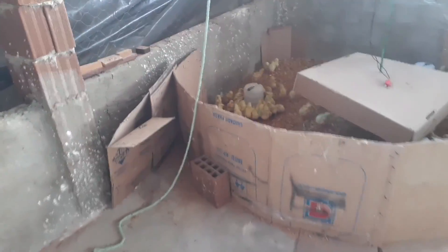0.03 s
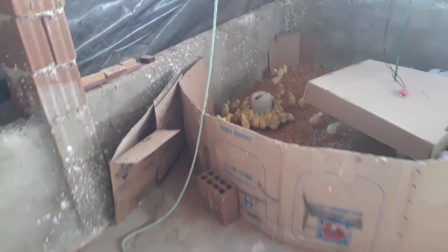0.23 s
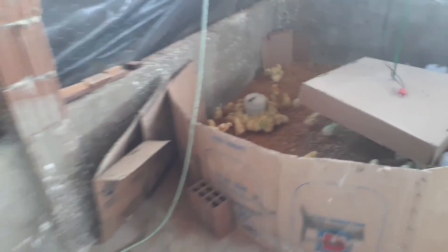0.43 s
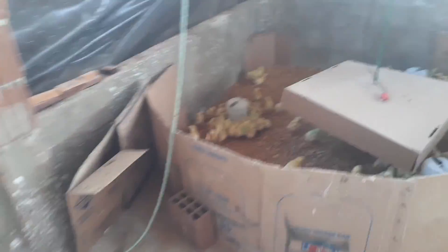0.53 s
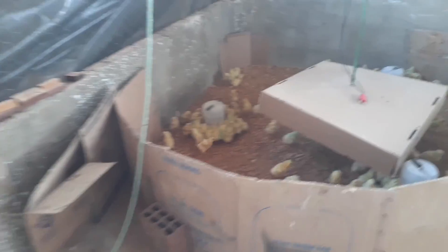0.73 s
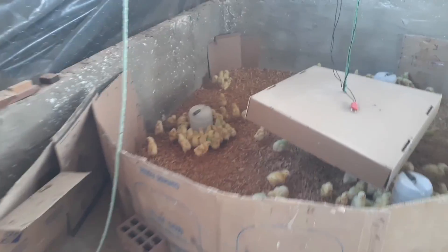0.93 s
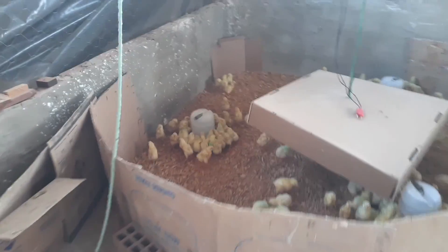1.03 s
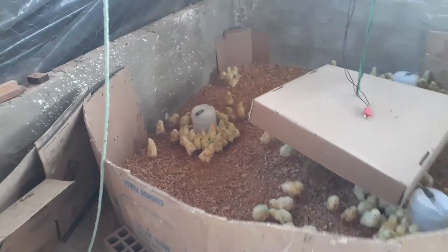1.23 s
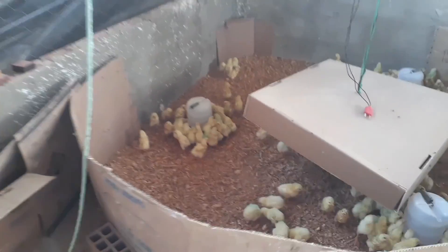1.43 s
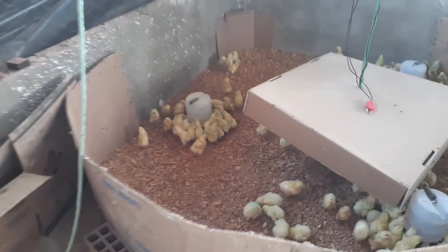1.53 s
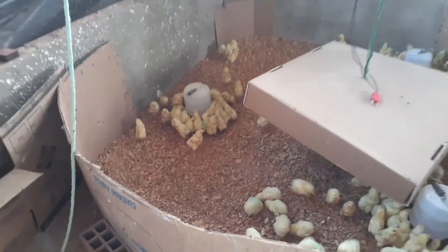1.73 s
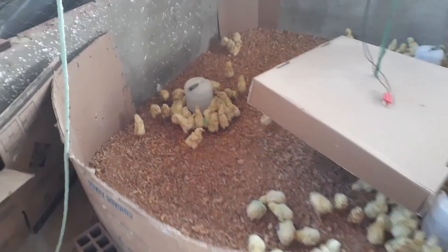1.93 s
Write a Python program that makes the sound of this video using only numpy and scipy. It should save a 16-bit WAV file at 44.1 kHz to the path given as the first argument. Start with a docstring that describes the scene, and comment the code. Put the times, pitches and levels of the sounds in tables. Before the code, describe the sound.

Many chicks cheep in short, high, overlapping whistles, some close to the microphone, with a brief indoor echo. A light tap comes early, a sharp snap midway and a soft bump at the end, over a quiet hum.

```python
"""Concrete-walled brooder: a large brood of chicks, the near ones standing out of a dense, echoing chorus.
Each peep is an almost pure whistle that bends, mostly downward; walls add reflections and a tail.
Brief events: a sharp snap and rustles (shaped noise), a light tap and a soft bump (damped sines).
Underneath: far hoots, a low hum, room noise."""
import sys
import numpy as np
from scipy import signal
from scipy.fft import rfft, irfft
from scipy.io import wavfile

SR = 44100
rng = np.random.default_rng(int(sys.argv[2]) if len(sys.argv) > 2 else 0)


def materialize(psi):
    """Save the field psi as 16-bit PCM at rate SR to the path in sys.argv[1].

    A 1-D psi becomes a single channel; in a 2-D psi each row is a channel.
    """
    bounded = np.clip(np.atleast_2d(psi).T, -1, 1)
    quanta = np.round(bounded * 32767).astype(np.int16)
    wavfile.write(sys.argv[1], SR, quanta)


N = 88200

# near peeps: t/s, length/s, first f/Hz, middle f/Hz, last f/Hz, level/dB
NEAR_PEEPS = [ (.11, 0.097, 4510, 4310, 4020, -47), (.145, 0.05, 3966, 3690, 3310, -39.5),
              (.13, 0.07, 2880, 2550, 2220, -42.5), (.2, .06, 3286, 2820, 2420, -34.5),
              (.235, 0.07, 2946, 2640, 2020, -45), (.31, 0.065, 2205, 2750, 3200, -42.5),
              (.335, 0.044, 4000, 4374, 4380, -43.5), (.37, 0.04, 3180, 3110, 2900, -36),
              (.35, 0.055, 2857, 2577, 2005, -32.5), (.392, 0.0368, 2488, 2460, 2370, -27),
              (.395, 0.043, 3040, 2920, 2800, -37), (.405, 0.039, 2070, 1978, 1880, -36),
              (.405, 0.0724, 4100, 4175, 4300, -42.5), (.566, 0.07, 4100, 3600, 2750, -40),
              (.645, 0.07, 4250, 4080, 3650, -44), (.615, 0.055, 3050, 3200, 3350, -41),
              (.66, 0.12, 3150, 2783, 2640, -37), (.68, 0.091, 3770, 3583, 3200, -38.5),
              (.69, 0.08, 2476, 2320, 2325, -44), (.75, 0.043, 2722, 2946, 3840, -34),
              (.748, 0.057, 3010, 2796, 2490, -36.5), (.795, 0.056, 2630, 2450, 2700, -41),
              (.855, 0.041, 3766, 3227, 2670, -35), (.86, 0.041, 2776, 2593, 2360, -38),
              (.905, 0.032, 1940, 1910, 1900, -47), (.915, 0.046, 4050, 4265, 4100, -42.5),
              (.9, .11, 4700, 4650, 4520, -57), (.92, 0.044, 3790, 3990, 3750, -42),
              (.945, 0.08, 3598, 3270, 2930, -37.5), (1.03, 0.03, 2870, 2740, 2600, -28.5),
              (1.06, 0.028, 3560, 3700, 3620, -35), (1.06, 0.093, 4620, 4870, 4440, -45),
              (1.085, 0.06, 4200, 4220, 4340, -43), (1.115, 0.037, 2490, 2120, 1950, -42.5),
              (1.29, 0.083, 2176, 2025, 1835, -45), (1.315, 0.057, 3650, 3130, 2560, -34.5),
              (1.425, 0.077, 3450, 3244, 2850, -40), (1.5, 0.077, 3700, 4070, 4125, -39.5),
              (1.53, 0.039, 2550, 2380, 2170, -37.5), (1.545, 0.048, 3450, 3350, 3050, -37),
              (1.595, 0.044, 4040, 4205, 4080, -39.5), (1.605, 0.066, 4050, 3740, 3320, -34.5),
              (1.675, 0.051, 3780, 3940, 4070, -38), (1.71, 0.036, 2030, 1926, 1690, -44.5),
              (1.705, 0.14, 3795, 3624, 3510, -38.5), (1.745, 0.084, 3500, 3190, 2890, -35),
              (1.765, 0.043, 2930, 2686, 2626, -34.5), (1.795, 0.043, 2435, 2810, 3080, -40),
              (1.785, 0.079, 4200, 4230, 4090, -45), (1.87, 0.097, 4110, 4330, 4500, -43),
              (1.91, 0.053, 3520, 3323, 2960, -35)]
# overtone weighting: f/Hz, level/dB
OVERTONE_SPECTRUM = [(4700, -19.5), (5500, -27.5), (7400, -30), (8500, -20), (10000, -29), (13000, -34)]
# chorus envelope: t/s, level/dB
CHORUS_ENVELOPE = [(0, -43), (.4, -39.5), (.53, -42.5), (.65, -45), (.92, -40.5), (1.12, -42.5),
                   (1.25, -41.5), (1.55, -42.5), (1.8, -41), (2, -42.5)]
# chorus colour: f/Hz, level/dB
CHORUS_SPECTRUM = [(1600, -15), (2000, -0.5), (2500, 1.5), (3000, 2), (3600, -3), (4300, -5), (5200, -53),
                   (7300, -50), (8600, 9.5), (13000, 9)]
# bursts of the snap: t/s, decay/s, level/dB
SNAP_BURSTS = [(1.0538, .002, -30), (1.056, .001, -19), (1.0615, .0014, -30), (1.0715, .0014, -32)]
# snap colour: f/Hz, level/dB
SNAP_SPECTRUM = [(500, -51), (2000, -2.5), (4500, -4), (7000, -8.5), (8700, 3), (11000, -3.5), (15500, -11)]
# ringing of the tap: f/Hz, decay/s, level/dB
TAP_RESONANCES = [(2450, .00035, -17), (1250, .0008, -29.5), (4200, .0002, -23)]
# knocks of the bump: t/s, level/dB
BUMP_KNOCKS = [(1.963, -36), (1.977, -32.5), (1.985, -29.5), (1.992, -23.5)]
# rustles: centre t/s, half length/s, level/dB
RUSTLE_SWELLS = [(0.264, 0.027, -49.5), (0.388, 0.045, -50.5), (0.475, 0.022, -56), (1.004, 0.045, -50),
                 (1.125, 0.048, -54), (1.44, 0.083, -59.5), (1.97, 0.028, -46.5)]
# rustle colour: f/Hz, level/dB
RUSTLE_SPECTRUM = [(300, -77), (1500, -19), (4500, 6), (7300, -6), (9000, 1), (15500, -7)]
# far hoots: t/s, length/s, f/Hz, level/dB
FAR_HOOTS = [(1.17, .07, 520, -58), (1.46, .28, 530, -59.5), (1.76, 0.06, 549, -55)]
# hum envelope: t/s, level/dB
HUM_ENVELOPE = [(0, -51), (.18, -51), (.28, -57.5), (.52, -56.5), (.62, -52), (.95, -48.5), (1.07, -62),
                (1.15, -57.5), (1.58, -49.5), (1.72, -55), (1.77, -58), (1.82, -52), (2, -59.5)]
# room noise colour: f/Hz, level/dB
NOISE_SPECTRUM = [(20, -30), (33, -11), (48, -2.5), (100, 2), (190, 0.5), (300, -5), (420, -9.5), (530, -5),
                  (900, -7), (1500, -13.5), (3000, -1.5), (5500, -19), (7400, -23.5), (9000, -23.5),
                  (15500, -24)]
# room noise swell: t/s, level/dB
NOISE_ENVELOPE = [(.12, 3.5), (.35, 1), (1.4, 1.5), (2, 0.3)]
# room noise likeness between ears: f/Hz, correlation
NOISE_COHERENCE = [(60, 0.86), (150, 0.93), (350, 0.86), (700, 0.24), (1300, 0)]
# room noise balance: f/Hz, left minus right level/dB
NOISE_BALANCE = [(100, 1), (700, 0.5), (1500, -3.5), (5000, -1), (9000, 5), (14000, 3.5)]
# brooder reverberation: f/Hz, T60/s
ROOM_T60 = [(200, 0.42), (2500, 0.29), (14000, 0.24)]

TIME_S, BINS_HZ = np.arange(N) / SR, np.fft.rfftfreq(N, 1 / SR)
NEAR_PAN_DB, EAR_SPREAD_S, WAVER_S = 3.5, .00031, .0025


def peep(length_s, first_hz, middle_hz, last_hz, waver):
    """Whistle on a shaky pitch arc: clear when high, hoarse when low."""
    clear_hz, hoarse_hz, shake_depth, flutter_db = 5400, 2400, .024, 5.5
    rise, fall = .26, .32  # shares of the length
    u = np.linspace(0, 1, round(length_s * SR))
    shake, flutter = (np.roll(waver, int(at * N))[:len(u)] for at in rng.random(2))
    hz = np.polyval(np.polyfit([0, .5, 1], [first_hz, middle_hz, last_hz], 2), u)
    hoarse = np.clip((clear_hz - hz) / (clear_hz - hoarse_hz), 0, 1)
    phase = 2 * np.pi * np.cumsum(hz * (1 + shake_depth * hoarse * shake)) / SR
    overtones = sum(amp(lookup(OVERTONE_SPECTRUM, k * hz)) * np.sin(k * phase) / (k - 1) for k in (2, 3))
    swell = np.sin(np.pi / 2 * np.minimum(u / rise, 1))
    fade = np.sin(np.pi / 2 * np.minimum((1 - u) / fall, 1))
    return swell * fade * unit_rms(amp(flutter_db * flutter) * (np.sin(phase) + overtones))


def near_chicks(direct_db=-9, echo_db=-4, typical_db=-36, boost_db_per_db=.8):
    """Closest chicks, direct and off the walls. Louder ones are closer: more direct sound."""
    waver, direct, places = drift(WAVER_S), np.zeros((2, N)), np.zeros((8, N))
    for k, (start_s, length_s, *arc_hz, db) in enumerate(NEAR_PEEPS):
        call = amp(db) * peep(length_s, *arc_hz, waver)
        close = amp(boost_db_per_db * max(db - typical_db, 0)) * call
        add(direct[0], start_s + EAR_SPREAD_S * rng.uniform(-1, 1), close)
        add(direct[1], start_s, close)
        add(places[k % len(places)], start_s, call)
    echoes = sum(room(place) for place in places)
    return pan(NEAR_PAN_DB) * (amp(direct_db) * direct + amp(echo_db) * echoes)


def chorus(count=480, range_db=9):
    """Rest of the brood: overlapping falling peeps at many distances, mostly echo."""
    top_hz, end_ratio, shortest_s, longest_s = (2398, 4249), (.72, .92), .03066, .065
    waver, direct, places = drift(WAVER_S), np.zeros((2, N)), np.zeros((4, N))
    for k, (when, span, top, drop, bend, nearness) in enumerate(rng.random((count, 6))):
        first_hz = np.interp(top, [0, 1], top_hz)
        last_hz = first_hz * np.interp(drop, [0, 1], end_ratio)
        middle_hz = first_hz + (last_hz - first_hz) * bend / 2
        length_s = np.interp(span, [0, 1], [shortest_s, longest_s])
        call = amp(range_db * nearness) * peep(length_s, first_hz, middle_hz, last_hz, waver)
        start_s = (k + when) / count * (N / SR + longest_s) - longest_s
        add(places[k % len(places)], start_s, call)
        for ear in direct:
            add(ear, start_s + EAR_SPREAD_S * rng.uniform(-.89, 1), nearness ** 2 / 2 * call)
    echoes = sum(room(place) for place in places)
    return pan(right_db=5.5) * envelope(CHORUS_ENVELOPE) * colour(direct + echoes, CHORUS_SPECTRUM)


def snap(echo_db=-6):
    """Cluster of bright noise bursts, gone in milliseconds, plus echo."""
    fade = sum(amp(db) * (TIME_S >= at_s) * np.exp(-abs(TIME_S - at_s) / decay_s)
               for at_s, decay_s, db in SNAP_BURSTS)
    burst = fade * colour(rng.standard_normal((2, N)), SNAP_SPECTRUM)
    return pan(right_db=1.7) * (burst + amp(echo_db) * room(burst[0]))


def knock(at_s, hz, decay_s, db):
    """Heavily damped blow: about one swing."""
    t = np.maximum(TIME_S - at_s, 0)
    return amp(db) * np.sin(2 * np.pi * hz * t) * np.exp(-t / decay_s)


def tap(at_s=.46, low_cut_hz=796, echo_db=-4.5):
    """Light, hard tap: damped modes plus echo."""
    ring = sum(knock(at_s, *mode) for mode in TAP_RESONANCES)
    blow = signal.sosfilt(signal.butter(2, low_cut_hz, "high", fs=SR, output="sos"), ring)
    return pan(NEAR_PAN_DB) * (blow + amp(echo_db) * room(blow))


def bump(hz=262, decay_s=.0018):
    """Quick run of dull knocks, close by."""
    return sum(knock(at_s, hz, decay_s, db) for at_s, db in BUMP_KNOCKS)


def rustles(grain_db=1.6, grain_s=.0062):
    """Brief swells of fine, grainy scuffing."""
    swell = sum(amp(db) * np.exp(-((TIME_S - at_s) / half_s) ** 2 / 2)
                for at_s, half_s, db in RUSTLE_SWELLS)
    grains = rng.standard_normal((2, N)) * amp(grain_db * drift(grain_s))
    return swell * colour(grains, RUSTLE_SPECTRUM)


def hoots(sag=.029):
    """Faint, unsteady, sinking tones, perhaps distant poultry."""
    waver, calls = drift(scale_s=.0071), np.zeros(N)
    for start_s, length_s, hz, db in FAR_HOOTS:
        add(calls, start_s, amp(db) * peep(length_s, hz * (1 + sag), hz, hz * (1 - sag), waver))
    return (calls + room(calls)) / np.sqrt(2)


def hum(centre_hz=71.3, waver_depth=.032):
    """Low, slowly wavering tone."""
    hz = centre_hz * (1 + waver_depth * drift(scale_s=.16))
    return envelope(HUM_ENVELOPE) * np.sqrt(2) * np.sin(2 * np.pi * np.cumsum(hz) / SR)


def room_noise(base_db=-46.5):
    """Near-steady noise, alike in both ears in the bass."""
    common, separate = rfft(rng.standard_normal((2, N)))
    coherence = lookup(NOISE_COHERENCE, BINS_HZ)
    tilt = amp(lookup(NOISE_BALANCE, BINS_HZ) / 2)
    right = coherence * common + np.sqrt(1 - coherence ** 2) * separate
    noise = irfft(np.array([common * tilt, right / tilt]), N)
    return amp(base_db) * envelope(NOISE_ENVELOPE) * colour(noise, NOISE_SPECTRUM)


def room(x, reflections=6, early_db=-3, gap_s=.002, early_span_s=.011, build_s=.0059):
    """Stereo echo from one spot: a few wall reflections, then a dense tail."""
    hz, t, noise = signal.stft(rng.standard_normal((2, SR // 2)), SR, nperseg=256)
    decay = amp(-60 * t / lookup(ROOM_T60, hz)[:, None])
    response = signal.istft(noise * decay * np.minimum(t / build_s, 1), SR, nperseg=256)[1]
    response /= np.linalg.norm(response, axis=1, keepdims=True)
    pulse = amp([early_db]) / np.sqrt(reflections)
    for ear in response:
        for when, polarity in rng.random((reflections, 2)):
            add(ear, gap_s + when * early_span_s, np.sign(polarity - .5) * pulse)
    response /= np.linalg.norm(response, axis=1, keepdims=True)
    return signal.fftconvolve(x[None], response, axes=1)[:, :N]


def amp(db):
    """dB to gain."""
    return 10 ** (np.asarray(db) / 20)


def unit_rms(x):
    """Scale to rms 1."""
    return x / np.sqrt(np.mean(x ** 2) + 1e-20)


def lookup(table, hz):
    """Interpolate over log frequency."""
    table_hz, values = np.transpose(table)
    return np.interp(np.log(hz + 1), np.log(table_hz + 1), values)


def envelope(table):
    """Level table to gain per sample."""
    return amp(np.interp(TIME_S, *np.transpose(table)))


def colour(x, spectrum):
    """Filter by a spectrum table; rms 1."""
    return unit_rms(irfft(rfft(x) * amp(lookup(spectrum, BINS_HZ)), N))


def pan(right_db):
    """Left and right gains."""
    return amp([[-right_db / 2], [right_db / 2]])


def add(mix, at_s, sound):
    """Mix in place, trimmed to fit."""
    at = round(at_s * SR)
    sound = sound[max(-at, 0):]
    part = mix[max(at, 0):][:len(sound)]
    part += sound[:len(part)]


def drift(scale_s):
    """Smooth random motion; rms 1."""
    return unit_rms(irfft(rfft(rng.standard_normal(N)) * np.exp(-(BINS_HZ * scale_s) ** 2), N))


def scene():
    """Stereo sum of all sources."""
    return room_noise() + hum() + rustles() + bump() + snap() + tap() + near_chicks() + chorus() + hoots()


def record(dry, edge_hz=16050):
    """Steep low-pass."""
    low_pass = signal.firwin(511, edge_hz, window=("kaiser", 9), fs=SR)
    return signal.oaconvolve(dry, low_pass[None], "same")


dry = scene()
out = record(dry)
materialize(out)
```